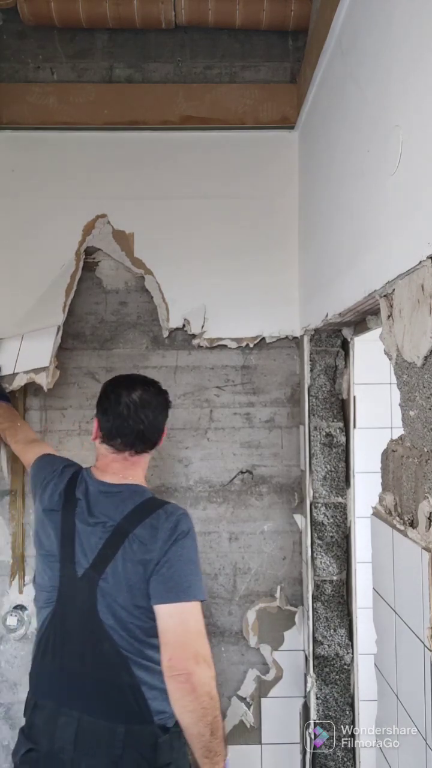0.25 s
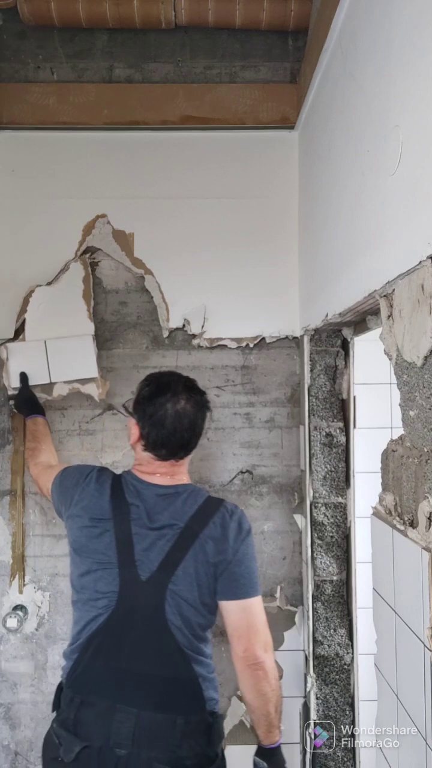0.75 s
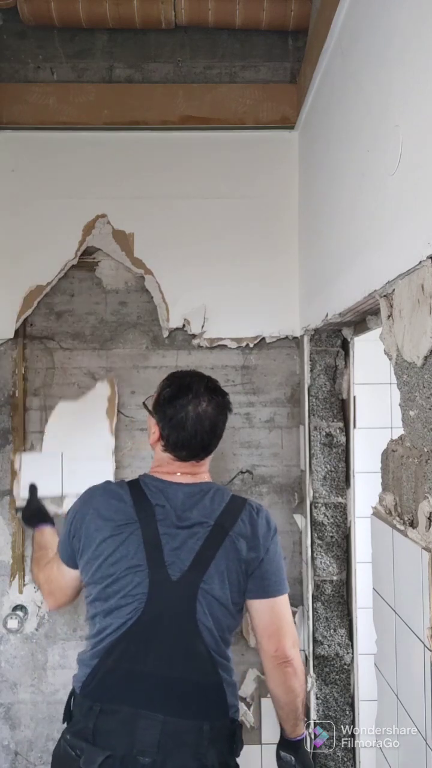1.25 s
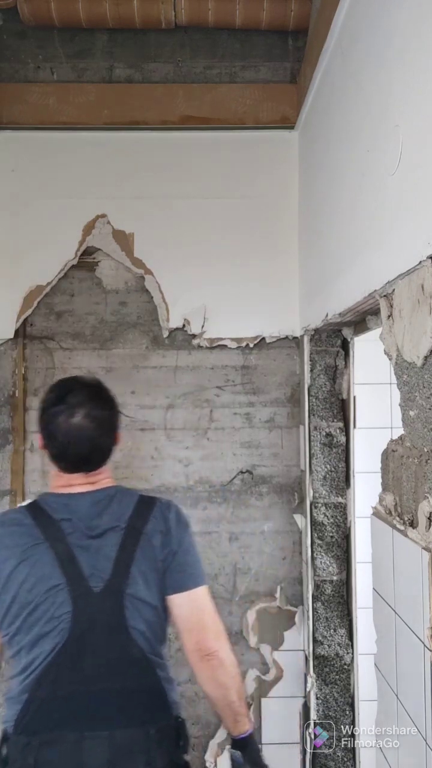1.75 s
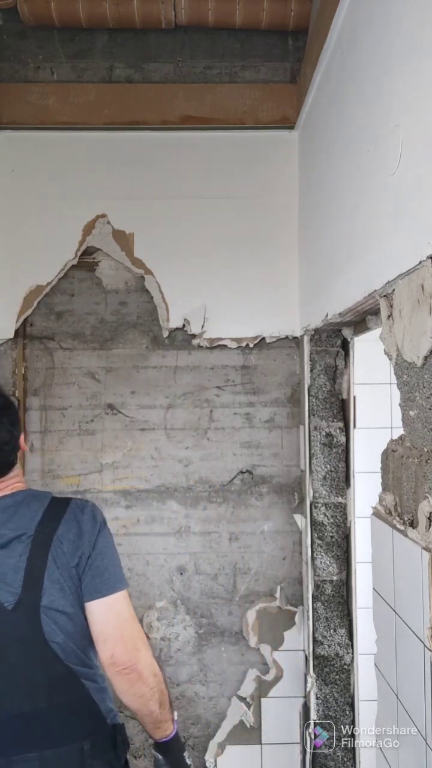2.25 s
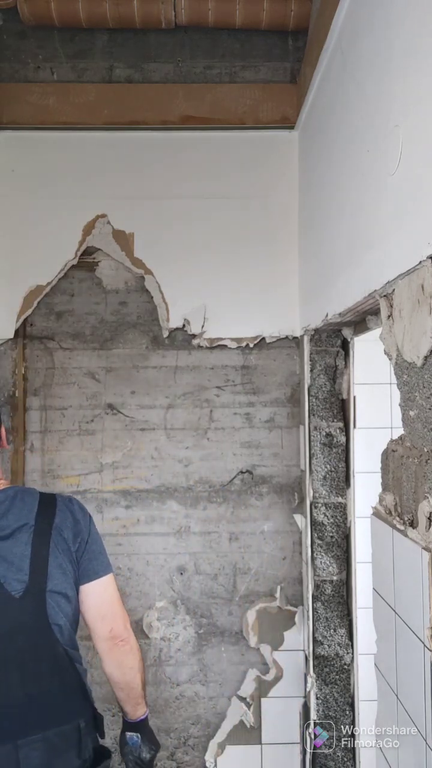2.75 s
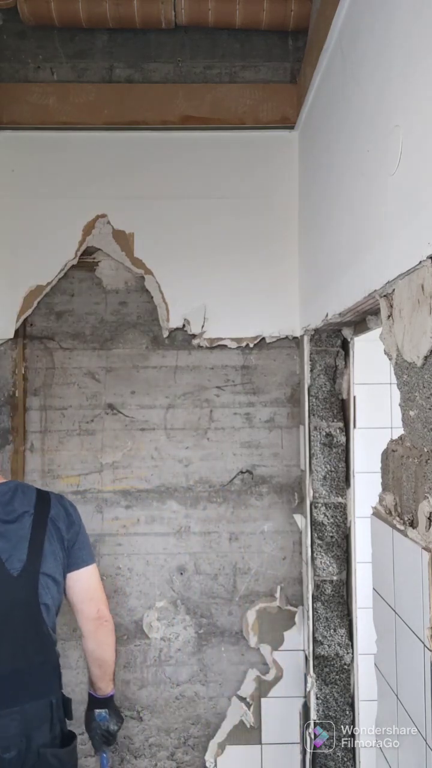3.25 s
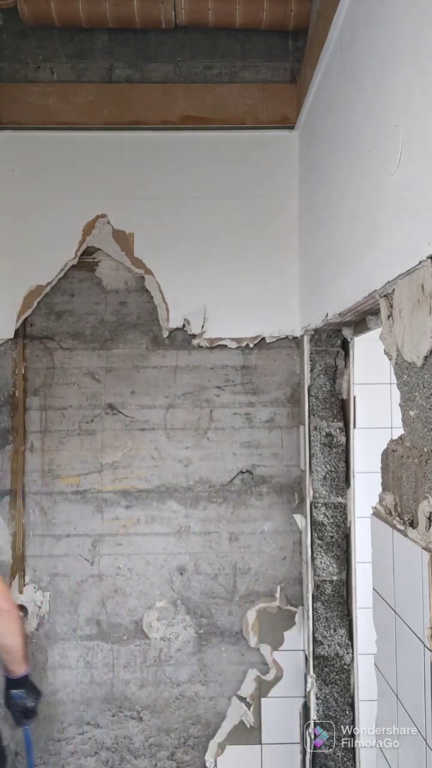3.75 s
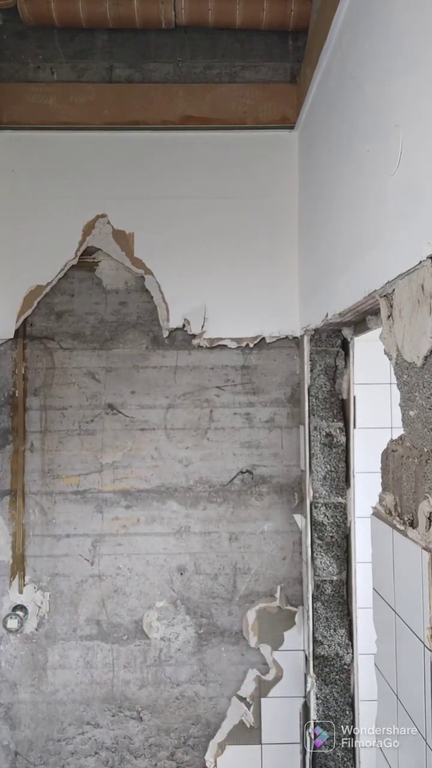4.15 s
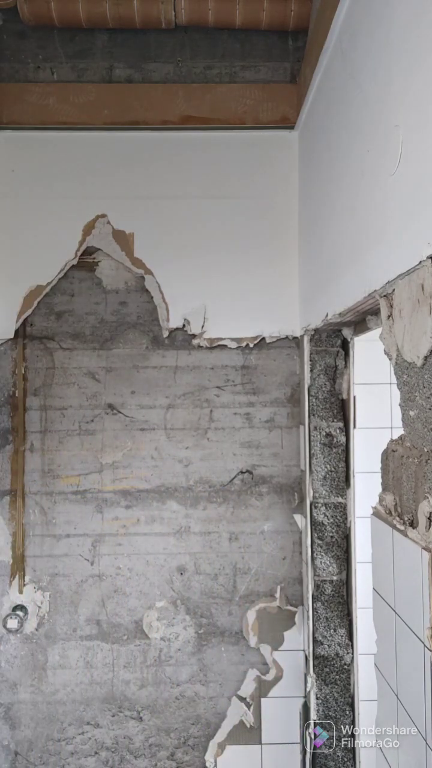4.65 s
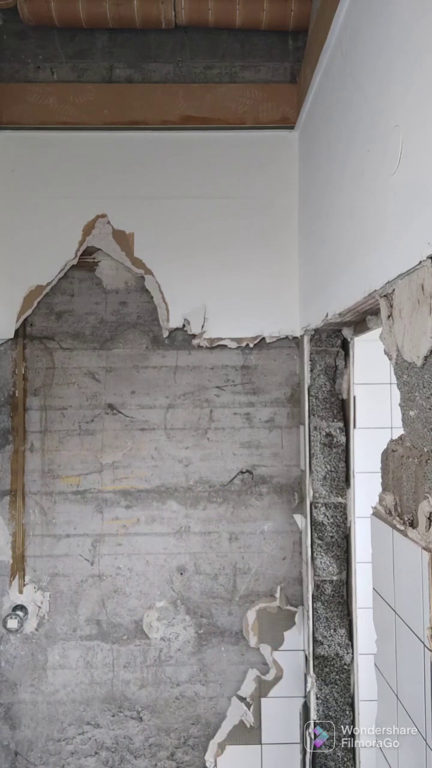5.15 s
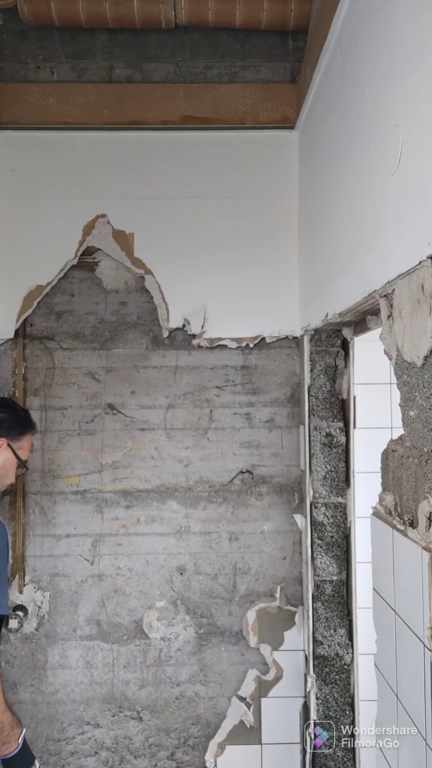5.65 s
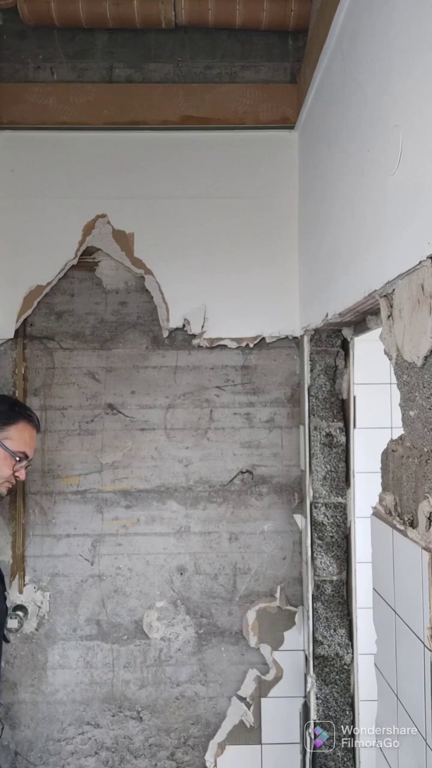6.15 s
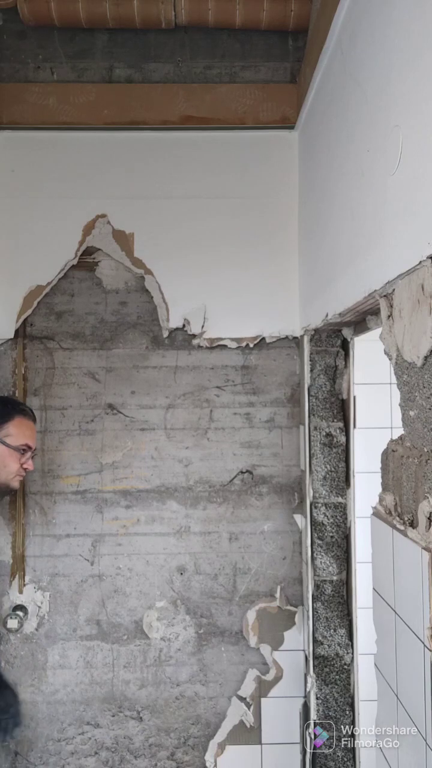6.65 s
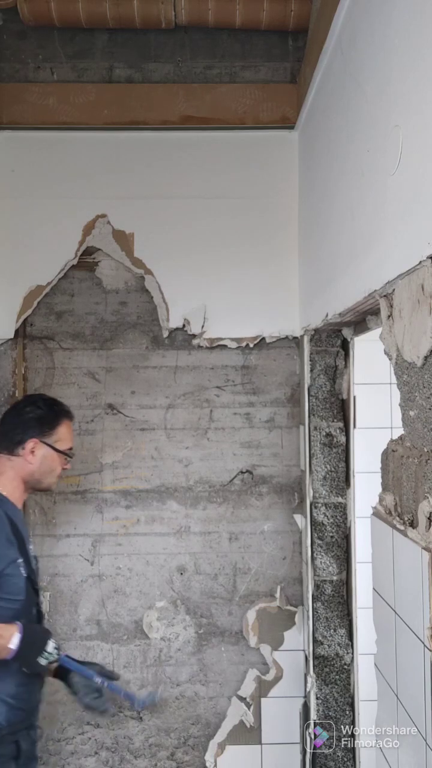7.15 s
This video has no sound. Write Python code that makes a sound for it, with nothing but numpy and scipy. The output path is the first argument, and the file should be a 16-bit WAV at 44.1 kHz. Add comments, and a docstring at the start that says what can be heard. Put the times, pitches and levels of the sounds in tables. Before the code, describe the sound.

A bare, tiled bathroom with short hard echoes, heard through a nearby phone over a dull distant hush and a faint wavering low hum. From 0 to 0.5 s light knocks and gritty scraping; at about 0.6 s a deep, loud thump and crunch as the slab breaks free, debris sliding. Strong clacks with brittle ceramic clinks at 1.03 and 1.18 s, smaller knocks and crumbling to 1.7, sharp cracks at 1.83 and 1.9. From 2.1 to 3.5 s only faint ticks and grit. Dull hollow bumps at 3.7-3.95, small clicks at 4.75-4.85. At 5.1 s a heavy load lands in the next room, a booming burst of knocks with rattle dying until 5.7. A bright clack at 5.93, then near quiet with tiny ticks. At 7.18 s a sudden loud, sharp tile blow, ringing briefly, with crunching rubble to the end at about 7.4.

```python
"""Blows and sliding rubble as a slab of tile and plaster is torn off the wall of a bare bathroom; pieces knock,
clink and crunch on the floor, a heavy load is put down next door, and loose shards chatter as they ring.
Blows, grains and the load's rattle are noise bursts and clicks through seven band pulses; clinks are dying sines.
All these pass through the room's echo; a low hum and a dull hush are added, then a phone limits peaks and band."""
import sys
import numpy as np
from scipy import signal
from scipy.io import wavfile
from scipy.ndimage import uniform_filter1d

SR = 44100
rng = np.random.default_rng(int(sys.argv[2]) if len(sys.argv) > 2 else 0)


def bounce(signal):
    """Save signal as a 16-bit WAV file at the path given by the first command-line argument."""
    frames = np.transpose(np.atleast_2d(signal))
    limited = np.clip(frames, -1, 1)
    pcm = np.round(limited * 32767).astype(np.int16)
    wavfile.write(sys.argv[1], SR, pcm)


N = 325458
EDGE_HZ = 15700  # upper band limit
# Lead of the right port over the left in seconds, negative is a delay: one for each of the three late echo
# tails that take turns.
LAG_S = (.0004, -0.00048, 0.0002)


def gain_of(db):
    """Amplitude factor of a level in dB."""
    return 10 ** (np.asarray(db) / 20)


def evened(x):
    """Scale to an RMS of 1."""
    return x / np.sqrt(np.mean(x ** 2) + 1e-20)


def smoothed(x, step):
    """Two moving averages, each step samples long."""
    return uniform_filter1d(uniform_filter1d(x, step), step)


def read(points, hz):
    """Interpolate a (Hz, value) table over log frequency."""
    f, value = np.transpose(points)
    return np.interp(np.log(hz + 1), np.log(f + 1), value)


def add(mix, s, sound):
    """Add a sound to the mix at s seconds, cut at the end of the mix."""
    part = mix[..., round(s * SR):][..., :sound.shape[-1]]
    part += sound[..., :part.shape[-1]]


def grains(count, per_s, spread_db):
    """Trains of randomly timed one-sample clicks of either sign, a few of them large; RMS 1 a train."""
    size_db = spread_db * np.minimum(rng.exponential(1, (count, N)), 5)
    size = gain_of(size_db) * rng.choice([-1, 1], (count, N))
    clicks = size * (rng.random((count, N)) < per_s / SR)
    return np.array([evened(train) for train in clicks])


def rubble():
    """Tearing, sliding and trickling debris: clumped grains drive the bands; each slide rises, holds and falls."""
    # Each row: peak, rise, hold and fall in seconds (rise and fall per 20 dB), then the peak levels of the
    # rumble, scrape, crumble and grit trains in dB.
    slides = [(0.0, 0.061, 0.0027, 0.018, -46, -38.5, -41, -34.5),
              (0.158, 0.15, 0.0061, 0.12, -30, -39.5, -38, -30.5),
              (0.274, 0.022, .005, 0.12, -52, -30.5, -32.5, -31),
              (0.495, 0.11, 0.087, 0.086, -27.5, -29.5, -34.5, -32),
              (0.572, 0.053, 0.044, 0.029, -20, -30, -20, -19),
              (0.701, 0.073, 0.042, 0.018, -33.5, -26, -24.5, -14),
              (0.75, .05, 0.0034, 0.2, -37.5, -39, -37, -25),
              (1.22, 1, 0.036, 0.37, -39.5, -42.5, -45, -37.5),
              (1.35, 0.14, 0.03, 0.049, -34, -49, -43, -40), (1.534, 0.28, 0.16, 0.3, -38, -41, -43, -33.5),
              (1.791, 0.079, 0.037, 0.05, -32, -38.5, -40.5, -34),
              (2.07, 0.022, 0.028, 0.046, -69, -46, -53.5, -61),
              (3.03, 0.094, 0.004, 0.081, -55, -52, -51, -42),
              (3.737, 0.056, 0.0063, 0.046, -24.5, -30.5, -33.5, -36.5),
              (3.897, 0.3, 0.24, 0.086, -50, -58.5, -66, -57.5),
              (5.236, 0.27, 0.27, 0.16, -35, -36.5, -42.5, -41.5),
              (6.091, 0.12, 0.005, 0.053, -61, -46, -44, -37), (6.65, 0.25, 0.05, 0.14, -60, -77, -62, -58),
              (7.29, 0.037, 0.09, .1, -35.5, -30.5, -35, -29)]
    # Dust that never quite rests: rumble, scrape, crumble and grit levels in dB.
    trickle_db = (-60.5, -72, -75, -69)
    clump_s, clump_db = 0.011, 4.0  # averaging length; RMS unevenness
    t = np.arange(N) / SR
    power = gain_of(trickle_db)[:, None] ** 2 * np.ones(N)
    for peak_s, rise_s, hold_s, fall_s, *levels_db in slides:
        before = np.maximum(peak_s - t, 0) / rise_s
        after = np.maximum(t - peak_s - hold_s, 0) / fall_s
        shape_db = -20 * (before + after)
        power = power + gain_of(levels_db)[:, None] ** 2 * gain_of(2 * shape_db)
    step = max(round(clump_s * SR), 1)
    clumps = gain_of(clump_db * evened(smoothed(rng.standard_normal((4, N)), step)))
    trains = np.sqrt(power) * evened(clumps) * grains(count=4, per_s=1100, spread_db=3.5)
    rumble, scrape, crumble, grit = trains
    boom = gain_of(-8.0) * rumble
    snap = gain_of(-9.5) * crumble + gain_of(-7.0) * grit
    fizz = gain_of(-22.0) * grit
    return np.array([boom, rumble, scrape, crumble, snap, grit, fizz])[:, None]


def drone():
    """A low wavering hum: a narrow band of noise carried along a gliding pitch."""
    # Each row: time in seconds, pitch in Hz, level in dB ahead of a fixed 6 dB cut.
    glide = [(0.0, 76, -63), (0.8, 81.5, -80), (1.701, 80, -56), (2.4, 73, -69), (3.332, 73, -62.5),
             (4.499, 72, -87), (5.301, 81, -46), (5.999, 79, -60.5), (7.38, 76, -70.5)]
    s, hz, db = np.transpose(glide)
    t = np.arange(N) / SR
    a, b = smoothed(rng.standard_normal((2, N)), 3000)
    carrier = np.exp(2j * np.pi * np.cumsum(np.interp(t, s, hz)) / SR)
    hum = evened(((a + 1j * b) * carrier).real)
    return gain_of(np.interp(t, s, db) - 6.0) * hum


def hush():
    """Street and house far off: steady dull noise with drifting spectral patches."""
    # Each row: frequency in Hz, relative density in dB per Hz.
    far_spectrum = [(12, -26.5), (20, 1), (35, -1), (54, -24), (132, -16.5), (178, -31.5), (205, -11),
                    (263, -24), (302, -13), (409, -18), (693, -21), (753, -29.5), (1420, -15),
                    (2040, -30.5), (15000, -84.5)]
    level_db, patch_db = -55.5, 1.6
    frames, hz = N // 256 + 5, np.fft.rfftfreq(1024, 1 / SR)
    a, b, c, d, patches = rng.standard_normal((frames, 513, 5)).T
    patches = evened(uniform_filter1d(uniform_filter1d(patches, 10, 0), 14, 1))
    colour = gain_of(read(far_spectrum, hz)[:, None] + patch_db * patches)
    z = ports(a + 1j * b, c + 1j * d, hz, LAG_S[-1]) * colour
    noise = signal.istft(z, nperseg=1024, noverlap=768)[1][:, :N]
    return gain_of(level_db) * evened(noise)


def clump(contact_ms, pan_db):
    """One contact in seven bands: a smooth push for the boom, noise cracks above; the thud builds slowest."""
    build = 1.5  # higher is a softer start
    stretch = np.array([[1.5], [2.2], [1.4], [1.1], [.9], [.8], [.8]])  # boom to fizz
    u = np.arange(3000) / SR * 1000 / np.clip(contact_ms, .5, 30) / stretch
    shape = u ** build * np.exp(-build * u)
    z = rng.standard_normal(3000)
    shape[1:] *= z * abs(z)  # squared size makes a few cracks stand out
    shape = shape / np.linalg.norm(shape, axis=1)[:, None]
    return shape[:, None] * gain_of([[pan_db / 2], [-pan_db / 2]])


def blows():
    """Each blow is a short clump of cracks that drives the seven bands; a thump is the push alone."""
    # Each row: start in seconds, crack, knock and thud levels in dB, contact time in ms ahead of a stretch
    # per band, left over right in dB, clack and snap above what is usual for such a blow in dB.
    blow_table = [(0.1459, -26, -5.5, -16, 1.7, -15.5, -7, 6), (0.189, -17, 1, -30, 1.4, -3, 3, -0.5),
                  (0.271, 2, -10, -10, 1.3, -4.5, 5.5, 2.5), (0.388, -1.5, -0.5, -12.5, 2.2, -11, 4.5, 6),
                  (0.3968, -4, -1.5, -19, 1, 10, -17, 7.5), (0.566, -2, 15, 23, 2.87, 0, -21, -2),
                  (0.598, 14, 15, 11, 3.8, -3.5, -3, 4.5), (0.655, -9, -3.5, 4.5, 0.93, -5, -9, -4),
                  (0.723, 1, -6.5, -14.5, 1.3, -5, 1, 6), (0.754, -5, -5, -13.5, 1.3, -2.5, 2, 2.5),
                  (0.88, -3, -29.5, -32.5, 5.1, -6.5, 7, -11), (1.032, 13, 15, 3.5, 3, -1.5, -2, -13.5),
                  (1.1698, 11, -6.5, -4.5, 5.3, -3.5, 8.5, 2), (1.1809, -5.5, 16.5, -0.5, 0.6, 0.5, 2, -3),
                  (1.202, -3.5, 4, -6.5, 1.2, 1.5, -0.5, 3), (1.2912, -11, -15, 4.5, 3.4, -5.5, 8, -2),
                  (1.334, -22, -10, -3, 0.77, -6, 10.5, -1.5), (1.367, -7, -15.5, -7.5, 0.84, -2.5, 9, 1),
                  (1.508, -14.5, -9, -12, 1.4, 2, 5, 2), (1.528, -1, -4.5, -4, 7.1, 0, -3.5, 1),
                  (1.569, -14, -13, -0.5, 3, -7, -2, 0.5), (1.6082, -27, -9.5, -1, 2.3, 1, -6, 1),
                  (1.834, 7, -2, -6.5, 5, -1.5, 1.5, -10), (1.905, 14, -7, -31.5, 3, -1, -2, -2),
                  (2.108, -8.5, -22.5, -42, 37, -1, 4, 1), (2.1899, -15, -30, -42, 2.8, 0, 10, 5),
                  (2.38, -25.5, -28, -47, 4.1, 0, -2, -11), (2.415, -17, -24, -40, 5.8, -2, -4, -3.5),
                  (2.595, -5, -21, -41.5, 2.9, -2, 3, 2.5), (2.8133, -11, -28, -47.5, 2.8, -2, 4.5, 1),
                  (2.992, -15.5, -26, -8.5, 1.45, -1, -4, 2), (3.09, -11, -42, -18, 2.9, -2, 2, -7),
                  (3.1882, -19.5, -33, -19.5, 2.5, -0.5, 10.5, 3.5),
                  (3.49, -21, -28, -42.5, 1.8, -1.5, 0.5, 0.5), (3.6824, -22, -9.5, -20, 3.9, -5, 0, 7),
                  (3.7522, -34, -12.5, -18, 3.8, -19, 14.5, -4), (3.922, -12, -14, -8, 2.5, -2.5, 1, 7),
                  (4.642, -10, -14.5, -13.5, 3, -0.5, -3, -1), (4.741, -3, -32, -29, 1.7, -7, 0, -3),
                  (4.752, -4.5, -27.5, -33, 1.1, 4.5, -3, -7.5), (4.8347, -10.5, -45, -34.5, 5, -3, 7, -1),
                  (4.862, -18, -21.5, -39.5, 2.1, -1, 5, -2),
                  (5.05, -20.5, -33.5, -5.5, 9.6, -1.5, -2, 3.5), (5.0763, -19, -4, -2, 1.8, 2, -8, 7.5),
                  (5.118, -2, 14, 13, 3, -10, 1.5, 11), (5.1319, 8, 14.5, 16.5, 1.55, 2, 3.5, 5.5),
                  (5.1731, -2, 12, 9, 2.5, -1, -14, -14), (5.218, -7, -0.5, 4, 1.8, 0, 10.5, 12),
                  (5.2543, -1.5, -3, 3.5, 2, 2, -10, -8), (5.3039, -7.5, -10, 13.5, 1.3, -4, -5, -3),
                  (5.368, 1, 8, 1, 3.7, -1.5, -2.5, 5), (5.39, -20, 0, 9, 2, -8, 0, -1),
                  (5.4726, -19, -4, 5.5, 1.9, -3, -0.5, 2), (5.51, -21, -5, 6, 1, 2, -6, -3),
                  (5.595, -25, -15, 3, 3.1, -6.5, 1, 3), (5.9279, -1, 0.5, -3, 3.6, -8, 3, 10.5),
                  (5.9381, 10, -2.5, -2, 1.5, 0, 7, 7), (6.243, -24, -33, -37, 3.6, -1, 9, 2),
                  (6.469, -26.5, -32, -46, 2, -2, 10, 4), (6.552, -23.5, -38, -39, 2.3, -3, 7, 1.5),
                  (6.712, -24, -31, -34, 3.6, -7, 6, 1), (6.7491, -27, -16.5, -20, 2.1, 2.5, -1, 4),
                  (6.781, -38, -31, -31, 2, -3, -5, 5), (7.098, -23, -18.5, -15.5, 7.1, -0.5, 3, 5),
                  (7.18, 17.5, 7, 17, 0.94, 1, 6.5, 7.5), (7.19, 12, 15, 1, 1.8, -7, -6.5, -2),
                  (7.213, 5, -3, 1, 1.4, 1, 14.5, 12), (7.313, -3.5, -11.5, -2, 1.54, -8, 4, 12.5)]
    # Heavy weights that shake the floor. Each row: start in seconds, boom level in dB.
    thump_table = [(0.597, 10), (2.9921, -15.5), (3.686, 0), (3.852, -4.5), (3.946, -4.5), (4.8342, -20.5),
                   (5.0768, -2), (5.132, 15), (5.9386, -3), (7.101, -13.5), (7.1827, 12)]
    boom_under_thud_db, snap_under_crack_db = -28, -6.5
    clack_offset_db, clack_share = -3, 0.35  # share of the way from knock to crack
    fizz_offset_db, fizz_slope = -32.5, 0.39  # slope: dB per dB of crack over knock
    hardness = 0.084  # dB of clack and fizz per dB of crack
    thump_ms, thump_pan_db = 2.76, -2
    drive = np.zeros((7, 2, N))
    for s, crack_db, knock_db, thud_db, contact_ms, pan_db, more_clack_db, more_snap_db in blow_table:
        bright_db, hard_db = crack_db - knock_db, hardness * crack_db
        boom_db = thud_db + boom_under_thud_db
        clack_db = clack_offset_db + knock_db + clack_share * bright_db + hard_db + more_clack_db
        snap_db = snap_under_crack_db + crack_db + more_snap_db
        fizz_db = fizz_offset_db + crack_db + fizz_slope * bright_db + hard_db
        levels = gain_of([boom_db, thud_db, knock_db, clack_db, snap_db, crack_db, fizz_db])
        add(drive, s, levels[:, None, None] * clump(contact_ms, pan_db))
    for s, boom_db in thump_table:
        add(drive[0], s, gain_of(boom_db) * clump(thump_ms, thump_pan_db)[0])
    return drive


def clinks():
    """Dying modes of plaster slabs and thin ceramic shards; a loose piece chatters, which blurs its ring."""
    # Each row: start in seconds, base frequency in Hz, level in dB, t60 in seconds, chatter share 0-1.
    clink_table = [(.19, 6430, -30.5, 0.03, 0.3), (.567, 443, -7.5, 0.06, 0.1),
                   (1.036, 6350, -13, 0.035, 0.57), (1.045, 2590, -20, 0.05, 0.4),
                   (1.069, 1543, -17.5, 0.14, 0), (1.183, 6740, -11.5, 0.044, 0.6),
                   (1.191, 4400, -26.5, 0.027, 0.3), (1.836, 7590, -23, 0.1, 0.2),
                   (1.839, 2670, -33, 0.055, 0), (1.843, 4870, -31.5, 0.027, 0.16),
                   (1.909, 7070, -27.5, 0.12, 0.8), (2.082, 1523, -40, 0.098, .9),
                   (2.26, 2670, -51, 0.18, .3), (2.201, 2680, -54.5, 0.23, 0.46),
                   (2.21, 2330, -50, .06, 0.4), (3.69, 207.3, -29, 0.45, 0.32), (3.752, 309, -23, 0.12, .4),
                   (3.759, 597, -25, 0.061, 0.17), (3.925, 4970, -44, 0.0098, .9),
                   (3.93, 8270, -34, .02, .5), (3.925, 12900, -55, 0.06, 0.4),
                   (4.751, 6970, -24.5, 0.046, 0.6), (4.75, 12600, -43, 0.09, 0.35),
                   (4.868, 2210, -49.5, 0.084, 0.25), (4.885, 2740, -54.5, .1, .3),
                   (4.868, 3180, -50.5, .09, .35), (4.863, 5000, -52, 0.072, 0.35),
                   (4.878, 7410, -47, 0.11, .4), (5.241, 7180, -35.5, 0.28, .5),
                   (5.27, 9180, -34.5, 0.069, .4), (5.933, 1690, -16.5, 0.082, 0.53),
                   (5.943, 2720, -15.5, 0.026, 0.7), (6.72, 7100, -53.5, 0.072, 0.3),
                   (7.18, 7020, -15.5, 0.06, .5), (7.182, 1322, -11.5, 0.081, 0.5),
                   (7.181, 13700, -36.5, .08, .9), (7.183, 472, -22, 0.12, 0.5),
                   (7.186, 2360, -8.5, 0.019, 0.34)]
    # Modes of a shard, a close pair. Each row: multiple of the base frequency, level in dB.
    shard_modes = [(1.001, 11), (1.029, -24.5)]
    chatter_cycles, rise_cycles = 6.4, 1.2  # cycles a loose piece stays in step; cycles a ring builds
    out, t = np.zeros(N), np.arange(SR // 3) / SR
    for s, hz, db, t60_s, share in clink_table:
        modes = sum(gain_of(mode_db) * np.sin(2 * np.pi * hz * k * t)
                    for k, mode_db in shard_modes if hz * k < EDGE_HZ)
        step = max(round(chatter_cycles * SR / hz), 1)
        chatter = evened(smoothed(rng.standard_normal(len(t)), step))
        share = np.clip(share, 0, 1)
        rise = 1 - np.exp(-(t * hz / rise_cycles) ** 2)
        decay = gain_of(db - 60 * t / t60_s)
        add(out, s, decay * rise * modes * (1 - share + share * chatter))
    # the rings carry nothing below about 140 Hz
    return signal.sosfilt(signal.butter(2, 140, "high", fs=SR, output="sos"), out)


def load():
    """A dense rattle of clicks through the next room, dying band by band after the heavy load lands."""
    # One row per band, boom to fizz: level in dB, t60 in seconds.
    rattle_bands = [(-26.5, 2.03), (-18, 2.09), (-21.5, 1.24), (-29.5, 1.07), (-39, 0.97), (-43.5, 0.7),
                    (-96.5, 1)]
    t = np.arange(N) / SR - 5.14  # seconds since landing
    db, t60_s = np.transpose(rattle_bands)[..., None]
    decay = gain_of(db - 60 * abs(t) / t60_s) * (t > 0)
    return (decay * grains(count=7, per_s=120, spread_db=3.0))[:, None]


def bands():
    """Material and microphone colour cut into seven minimum-phase pulses of energy 1.

    Low to high: boom, thud, knock, clack, snap, crack, fizz."""
    # Each row: frequency in Hz, relative density in dB per Hz.
    colour = [(40, -62), (100, -34.5), (200, -5.5), (450, -1), (760, -11), (1200, -6), (1600, -6.5),
              (2300, -16), (3700, -22.5), (5500, -14.5), (7000, -9), (8500, -18), (9500, -30.5),
              (14500, -19.5), (15800, -57.5)]
    # Six band edges in Hz.
    splits_hz = (300, 900, 1900, 3500, 5600, 9300)
    hz = np.fft.rfftfreq(4096, 1 / SR)
    below = [0 * hz] + [1 / (1 + (hz / edge) ** 12) for edge in splits_hz] + [1 + 0 * hz]
    pulses = []
    for low, high in zip(below, below[1:]):
        log_gain = np.log(gain_of(read(colour, hz)) * np.sqrt(abs(high - low)) + 1e-6)
        circle = np.r_[log_gain, log_gain[-2:0:-1]]
        pulse = np.fft.ifft(np.exp(np.conj(signal.hilbert(circle)))).real[:2048]
        pulses.append(pulse / np.linalg.norm(pulse))
    return pulses


def ports(a, b, hz, lag_s):
    """Two microphone ports: the right hears a share of the left, shifted in time and level, plus its own part."""
    # Each row: frequency in Hz, left-right likeness 0-1.
    likeness = [(60, 0.92), (330, 0.93), (600, 0.89), (1600, 0.13), (5000, 0.21), (14000, 0.11)]
    # Each row: frequency in Hz, left over right in dB.
    lean_db = [(60, 5.5), (300, 5), (1000, 12), (2500, 2.5), (5000, -4), (12000, -0.5)]
    standing_hz = 450  # well below this, standing waves reach both ports nearly in step
    same = np.clip(read(likeness, hz), 0, 1)[:, None]
    lean = gain_of(read(lean_db, hz) / 2)[:, None]
    lead_s = lag_s * hz ** 2 / (hz ** 2 + standing_hz ** 2)
    shift = np.exp(2j * np.pi * hz * lead_s)[:, None]
    right = same * a * shift + np.sqrt(1 - same ** 2) * b
    return np.array([a * lean, right / lean])


def tail(t60_scale, direct, lag_s):
    """Echo response: sparse random-sign taps behind the direct path, dying by frequency; mean energy 1 a channel."""
    # Each row: frequency in Hz, t60 in seconds ahead of t60_scale.
    decay_times = [(100, 0.84), (300, 0.33), (1000, 0.25), (3000, 0.37), (7000, 0.34), (13000, 0.32)]
    taps = np.zeros((2, SR * 3 // 4))
    jitter = rng.integers(0, 20, (2, (taps.shape[1] - 573) // 20))
    at = np.arange(572, taps.shape[1] - 20, 20) + jitter
    np.put_along_axis(taps, at, rng.choice([-1., 1.], at.shape), 1)
    taps[:, 512] = direct
    hz, t, z = signal.stft(taps, SR, nperseg=512)
    decay_db = -60 * abs(t - 512 / SR) / read(decay_times, hz)[:, None] / t60_scale
    z = ports(*z, hz, lag_s) * gain_of(decay_db)
    heard = signal.istft(z, SR, nperseg=512)[1]
    return heard * np.sqrt(2) / np.linalg.norm(heard)


def room(x):
    """Direct sound with quickly dying echoes; three longer tails take turns, each with its own port lag."""
    early_db, late_db, turns_per_s = -9.0, -5.5, 1.3
    out = gain_of(early_db) * signal.oaconvolve(x, tail(0.62, 3.44, LAG_S[0]), axes=1)
    turn = 2 * np.pi * turns_per_s * np.arange(N) / SR
    for k, lag_s in enumerate(LAG_S):
        window = np.sqrt(2 / 3) * np.cos(turn + 2 * np.pi * k / 3)  # the three powers sum to 1
        out += gain_of(late_db) * signal.oaconvolve(x * window, tail(0.93, 0, lag_s), axes=1)
    return out[:, 512:N + 512]


def scene():
    """Band-shaped debris and rings through the room, plus rings from close by, hush and hum."""
    ring_near_db, ring_room_db = -9.5, -3.5
    drive = blows() + rubble() + load()
    debris = sum(signal.oaconvolve(d, pulse[None], axes=1)[:, :N] for d, pulse in zip(drive, bands()))
    rings = clinks()
    near = signal.oaconvolve(rings[None], tail(0.32, 6.0, LAG_S[-1]), axes=1)[:, 512:N + 512]
    echoed = room(debris + gain_of(ring_room_db) * rings)
    return echoed + gain_of(ring_near_db) * near + hush() + drone()


def record(dry):
    """The loudest peaks round off in the input stage; then the band limit of the phone."""
    rounded = dry / (1 + dry ** 6) ** (1 / 6)
    lowpass = signal.firwin(511, EDGE_HZ, window=("kaiser", 9), fs=SR)
    return signal.oaconvolve(rounded, lowpass[None], "same")


dry = scene()
out = record(dry)
bounce(out)
```